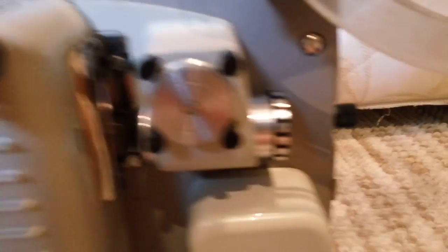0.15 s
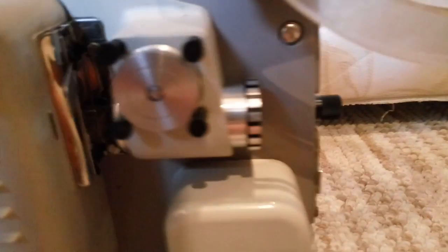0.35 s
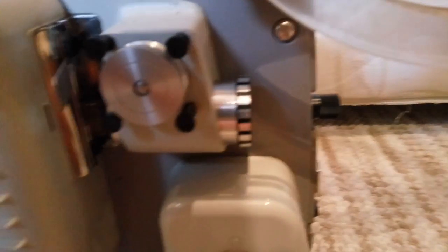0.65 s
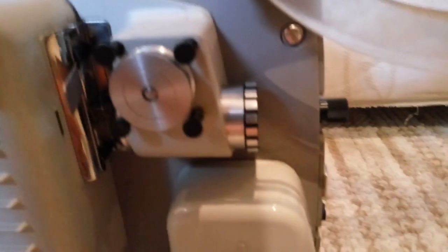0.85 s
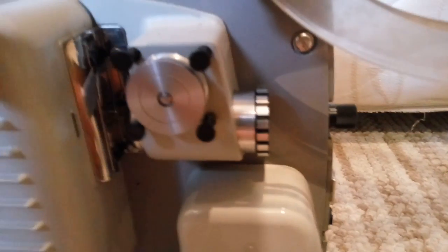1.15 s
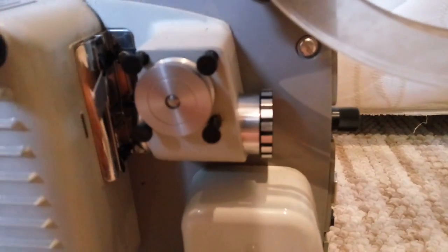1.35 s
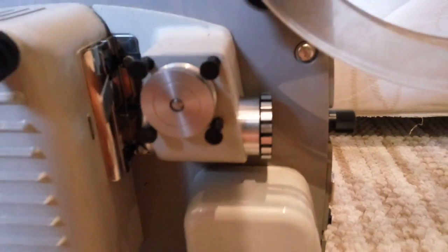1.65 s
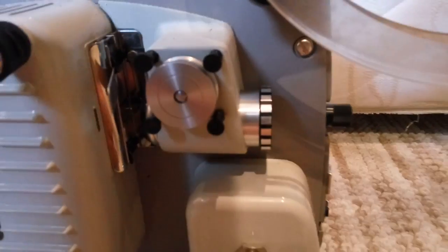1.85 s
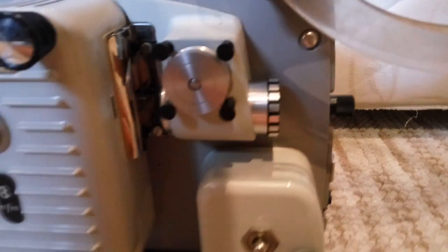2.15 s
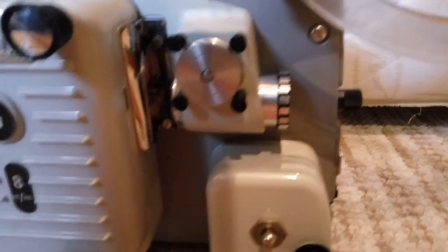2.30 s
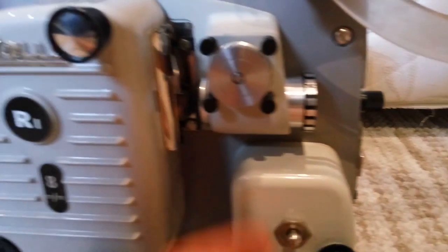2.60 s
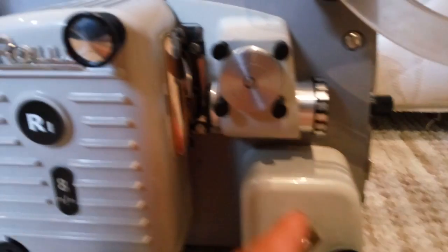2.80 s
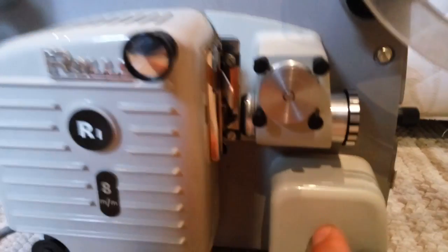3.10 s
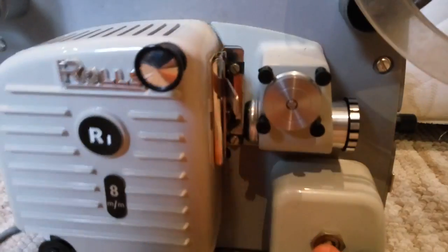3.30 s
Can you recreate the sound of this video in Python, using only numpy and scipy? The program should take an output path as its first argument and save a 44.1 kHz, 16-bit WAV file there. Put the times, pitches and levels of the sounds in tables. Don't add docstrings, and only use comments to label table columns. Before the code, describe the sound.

A small film projector whirrs and chatters rapidly, then a toggle switch snaps loudly near the end

```python
import sys
import numpy as np
from scipy import signal
from scipy.fft import rfft, irfft
from scipy.io import wavfile
from scipy.ndimage import uniform_filter1d

SR = 44100
rng = np.random.default_rng(int(sys.argv[2]) if len(sys.argv) > 2 else 0)


def volts_from_db(level):
    exponent = np.asarray(level, float) / 20
    return 10 ** exponent


def digitize_waveform(pressure):
    field = np.atleast_2d(pressure).T
    bounded = np.clip(field, -1, 1)
    quanta = np.round(bounded * 32767).astype(np.int16)
    wavfile.write(sys.argv[1], SR, quanta)


N = 152586
T = np.arange(N) / SR


def at_level(x, db):
    return x * volts_from_db(db) / np.sqrt(np.mean(x ** 2))


def band(x, lo_hz, hi_hz, order=2):
    return signal.sosfilt(signal.butter(order, [lo_hz, hi_hz], "bandpass", fs=SR, output="sos"), x)


def walk(rate_hz):
    hold = int(SR / rate_hz)
    steps = np.repeat(rng.standard_normal(N // hold + 1), hold)
    return 0.68 * uniform_filter1d(uniform_filter1d(steps, hold), hold)[:N]


def swell(hz):
    # middle in seconds, length in seconds, resonance in Hz, swell in dB.
    swells = [(0.29, 0.33, 332, 4.5), (1.45, 0.45, 332, 4.5), (2.654, 0.29, 332, 8), (0.28, 0.25, 915, 2.5),
              (1.1, 0.23, 915, 5), (.17, 0.36, 1178, 7.5), (1.8, .12, 1178, 12), (2.62, 0.82, 1178, 8.5),
              (0.16, 0.075, 1362, 8.5), (.46, 0.041, 1362, 5.5), (0.903, 0.086, 1362, 8),
              (1.35, 0.43, 1362, 6), (2.4, 0.079, 1362, 4), (2.89, 0.23, 1362, 4.5), (1.1, 0.41, 2565, 8),
              (1.23, 0.18, 2565, 7), (1.53, .15, 2565, 0), (1.8, 1, 2565, 6.5), (0.65, 0.2, 3320, 6.5),
              (0.92, 0.27, 3320, 10), (1.276, 0.091, 3320, 9.5), (1.64, 0.28, 3320, 4),
              (0.49, 0.48, 3830, 5), (0.85, .1, 3830, 11.5), (1.63, 0.66, 3830, 4), (2.38, 0.18, 3830, 5.5),
              (2.66, 0.16, 3830, 6), (3.7, 0.11, 3830, 10.5), (3.18, .25, 3830, 4)]
    near = [row for row in swells if abs(np.log(hz / row[2])) < 1 / 30]
    return sum(db * np.exp(-(2 * (T - middle) / length) ** 2) for middle, length, _, db in near)


def ring(push, modes, patchy_db=0., rate_hz=10.0):
    out = np.zeros((2, N))
    for hz, left_db, right_db, t60 in modes:
        pole = np.exp(2j * np.pi * hz / SR - np.log(1000) / (t60 * SR))
        uneven_push = push * volts_from_db(patchy_db * walk(rate_hz) + swell(hz))
        tone = signal.lfilter([1], [1, -pole], uneven_push) / np.sqrt(t60)
        turn = np.exp(-1j * np.pi * min((hz / 2200) ** 2, 1) * rng.uniform(0.48, 2.39))
        out += [volts_from_db(left_db) * tone.imag, volts_from_db(right_db) * (tone * turn).imag]
    return out


def colour(x, spectrum):
    points = np.array(spectrum)
    octave = np.log2(np.maximum(np.fft.rfftfreq(N, 1 / SR), 10))
    point_octave = np.log2(points[:, 0])
    fall_db_per_octave, air_db = -51, -37.5
    db = np.interp(octave, point_octave, points[:, 1])
    db = db + fall_db_per_octave * np.maximum(octave - point_octave[-1], 0)
    return irfft(rfft(x) * np.hypot(volts_from_db(db), volts_from_db(air_db)), N)


def control(column):
    # time in seconds, lateness of the strikes in ms, cam thump level in dB,
    # chatter level in dB, left port brightness in dB.
    run = [(0, 0.96, 6, -5, 4.5), (.25, 0.78, 2.5, 0, 2), (.45, 0.53, 7.5, -2, 4), (.8, 0.23, 2, -4, 4),
           (1.2, 0.069, 3.5, -3, 2.5), (1.55, 0.075, 5, -0.5, -1), (1.9, 0.065, 2, -3, -1),
           (2.3, 0.11, 4, -2, -3), (2.7, 0.33, 3, 0, -4.5), (3.0, 0.35, 4, -1, -4),
           (3.46, 0.65, 3, -2, -6.5)]
    return np.interp(T, np.array(run)[:, 0], np.array(run)[:, column])


def strikes(places, scatter_db, jitter_s, hard=()):
    frame_hz = 19.45
    blows = np.zeros(N)
    frames = np.arange(-1, int(N / SR * frame_hz) + 1)
    for place, db in places:
        time_chance, force_chance = rng.standard_normal((2, len(frames)))
        t = (frames + place) / frame_hz
        t = t + np.interp(t, T, control(1)) / 1000 + jitter_s * time_chance
        extra_db = sum(up * (abs(t - s) < 1 / 160) for s, up in hard)
        force_db = db + scatter_db * force_chance + extra_db
        ok = (t >= 0) & (t < (N - 1) / SR)
        blows[(t[ok] * SR).astype(int)] += volts_from_db(force_db[ok])
    return blows


def contact(blows, length_s, rough):
    scrape = signal.fftconvolve(blows, np.hanning(int(length_s * SR) + 3))[:N]
    return (1 - rough) * 3 * blows + rough * scrape * rng.standard_normal(N)


def hum():
    # pitch in Hz, rms level in dB.
    hum_tones = [(99.9, -58), (199.8, -67.5)]
    return sum(volts_from_db(db + .45 * walk(6.7)) * np.sqrt(2) * np.sin(2 * np.pi * hz * T) for hz, db in hum_tones)


def gear_whirr():
    # pitch in Hz, left level in dB, right level in dB, time to fade by 60 dB in seconds.
    gear_modes = [(1100, -8, -6, .04), (1178, -5, -3, .06), (1362, -6, 3, .09), (1550, -14, -7, .06),
                  (1735, -9, -4, .04), (2570, -18, -2, .06), (3320, -20, 2, .055), (3820, -14, -4, .05)]
    gears = ring(rng.standard_normal(N), gear_modes, 0.3, 4.6)
    return at_level(band(gears, 800., 4400.0), -44)


def fan_whistle():
    # pitch in Hz, left level in dB, right level in dB, time to fade by 60 dB in seconds.
    fan_modes = [(9300, -4, -5, 0.0046), (10900, -3, -4, 0.0028)]
    fan = np.zeros((2, N))
    for mode in fan_modes:
        fan += band(ring(rng.standard_normal(N), [mode], 2, 7.3), mode[0] - 500, mode[0] + 500)
    return at_level(fan, -79)


def motor_rush(claw):
    # frequency in Hz, strength in dB.
    rush_left = [(30, -16), (130, -7.5), (260, 11.5), (620, -1), (1100, 13.5), (2300, 0), (3200, -2),
                 (7200, -8)]
    rush_right = [(30, -1), (130, 2), (260, 9.5), (620, 3), (1300, 0.5), (3300, 12.5), (4300, -1.5),
                  (7200, -18.5)]
    tick_db, tick_s = 12.5, .005
    tick = volts_from_db(tick_db) * signal.fftconvolve(claw, np.hanning(int(tick_s * SR)))[:N]
    low = signal.butter(2, 600., "low", fs=SR, output="sos")
    high = signal.butter(2, 3800., "high", fs=SR, output="sos")
    shared, rush = rng.standard_normal(N), []
    for spectrum in (rush_left, rush_right):
        own = rng.standard_normal(N) * volts_from_db(2.7 * walk(29.88))
        shared_low = signal.sosfilt(low, shared - 0.86 * own)
        treble_tick = signal.sosfilt(high, tick * rng.standard_normal(N))
        rush.append(colour(own + shared_low + treble_tick, spectrum))
    return at_level(np.array(rush), -44)


def rumble():
    deep = signal.sosfilt(signal.butter(2, 45., fs=SR, output="sos"), rng.standard_normal(N))
    return at_level(deep * volts_from_db(5 * walk(5.5)), -67.5) * np.array([[.8], [1.2]])


def motor(claw):
    return hum() + fan_whistle() + gear_whirr() + motor_rush(claw) + rumble()


def claw_strikes():
    # place in the frame from 0 to 1, strength in dB.
    claw_places = [(.515, -1), (.665, 0), (.105, -11), (.94, -12)]
    # time in seconds, extra strength in dB.
    hard_strikes = [
        (.545, 5),
        (.699, 3),
        (.802, 3),
        (.9, 2),
        (1.37, 2),
        (1.676, 4),
        (1.985, 8),
        (3.27, 5),
    ]
    return strikes(claw_places, 1.2, .0003, hard_strikes)


def lever():
    # place in the frame from 0 to 1, strength in dB.
    lever_places = [(.125, -2), (.435, 0), (.565, -3), (.76, -7), (.28, -8), (.9, -9)]
    # pitch in Hz, left level in dB, right level in dB, time to fade by 60 dB in seconds.
    plate = [(828, -11.5, -1, 0.032), (909, 2, -3.5, 0.057), (926, -12.5, -6.5, 0.072)]
    push = contact(strikes(lever_places, 0.56, 0.00041), 0.0047, 0.52)
    return at_level(band(ring(push, plate, 1.), 690.0, 1016.0), -47)


def pawl():
    # place in the frame from 0 to 1, strength in dB.
    pawl_places = [(.93, 0), (.18, 0), (.06, -2), (.28, -2), (.51, -1.5), (.63, -3)]
    # pitch in Hz, left level in dB, right level in dB, time to fade by 60 dB in seconds.
    bracket = [(1128, -18, -9, 0.0083), (1178, -6, 3, 0.066), (1383, -17, -5, 0.027),
               (1510, -15, 3.5, 0.037), (1790, -9, 8, 0.023), (1885, -13.5, -3, 0.022)]
    push = contact(strikes(pawl_places, 1.3, 0.00045), 0.0038, 0.68)
    return at_level(band(ring(push, bracket, 1.2, 8.6), 880.0, 2300.0), -51)


def cam():
    # place in the frame from 0 to 1, strength in dB.
    cam_places = [(.195, -2.5), (.78, -4), (.98, -13.5), (.44, -14)]
    # pitch in Hz, left level in dB, right level in dB, time to fade by 60 dB in seconds.
    casing = [(332.9, -1, -2.2, 0.073), (379.2, -4, 0.97, 0.039), (406.5, 0.9, -0.53, 0.061)]
    teeth_hz, teeth_s = 374, 0.0045
    t = T[:int(teeth_s * SR)]
    teeth = np.hanning(len(t)) * np.sin(2 * np.pi * teeth_hz * t)
    push = contact(strikes(cam_places, 0.85, 0.0004), 0.0076, 0.13)
    push = signal.fftconvolve(push, teeth)[:N]
    thumps = band(ring(push, casing, 0.68, 5.), 317.7, 454.0)
    return at_level(thumps, -41.5) * volts_from_db(control(2))


def gate(claw):
    # pitch in Hz, left level in dB, right level in dB, time to fade by 60 dB in seconds.
    gate_modes = [(2270, -12, -8, .018), (2560, -21, -6, .03), (2800, -22, -8, .015),
                  (4580, -13, -15, .016), (5400, -20, -19, .007), (6990, -17, -30, .010),
                  (7500, -22, -33, .007)]
    return at_level(ring(contact(claw, 0.0035, 0.57), gate_modes, 1.0, 4.66), -48)


def shutter():
    # place in the frame from 0 to 1, strength in dB.
    shutter_places = [(.52, 0), (.935, -1), (.11, -4), (.69, -6)]
    # time in seconds, extra strength in dB.
    slams = [
        (1.282, 7),
        (.545, 2),
        (1.982, 3),
    ]
    # pitch in Hz, left level in dB, right level in dB, time to fade by 60 dB in seconds.
    aperture = [(2560, -21, -6, .035), (2960, -24, -9, .02), (3320, -18, 2, .045), (4600, -19, -21, .016)]
    push = contact(strikes(shutter_places, 1.5, .0004, slams), .006, .9)
    return at_level(band(ring(push, aperture, .8, 5.), 2300., 4900., order=3), -42.5)


def spring():
    # place in the frame from 0 to 1, strength in dB.
    spring_places = [(.175, 0), (.95, -3.5), (.40, -9), (.55, -9), (.68, -10)]
    # pitch in Hz, left level in dB, right level in dB, time to fade by 60 dB in seconds.
    guide = [(3800, -13, 0, .04), (3880, -9, -3, .035), (3320, -28, -8, .045)]
    push = contact(strikes(spring_places, 1.5, .0004), .006, .95)
    return at_level(band(ring(push, guide, .8, 5.), 3450., 4050.), -44.5)


def chatter(claw):
    left, right = band(gate(claw) + shutter() + spring(), 1500., 7600., order=3)
    ports = np.array([left * volts_from_db(control(4)), band(right, 1000., 5200., order=1)])
    return ports * volts_from_db(control(3))


def fading_noise(blows, t60_s):
    fade = volts_from_db(-60 * T[:SR // 2] / t60_s)
    return signal.fftconvolve(blows, fade)[:N] * rng.standard_normal(N)


def switch():
    # time in seconds, strength in dB.
    snap = [
        (3.3688, -44),
        (3.3871, 0),
        (3.3881, -1),
        (3.3892, -6),
        (3.3935, -17),
        (3.396, -17),
        (3.403, -27),
        (3.422, -31),
        (3.454, -40),
    ]
    # pitch in Hz, left level in dB, right level in dB, time to fade by 60 dB in seconds.
    toggle = [(530, -27, -22, .09), (720, -25, -18, .07), (1080, -27, -21, .06), (1986, -11, -9, .012),
              (2300, -5, 0, .01), (2650, -9, -1, .01), (2955, -19, 2, .026), (3395, -24, -1, .026),
              (3805, -24, -8, .015), (5087, -11, -11, .012), (5880, 2, -11, .011), (6600, -6, -20, .009),
              (7440, -12, -13, .007), (10600, -18, -13, .004)]
    # frequency in Hz, strength in dB.
    crack_left = [(150, -17.5), (1000, -4), (2300, -1.5), (3500, -15.5), (6000, 1.5), (8000, -2),
                  (10000, -15.5), (14000, -30)]
    crack_right = [(150, -5), (1000, -16), (2300, -2.5), (3300, 9), (5500, -6.5), (7000, -14), (10000, -17),
                   (14000, -26)]
    snap_db, crack_db, rattle_db = 7.5, -5, -27
    blows = np.zeros(N)
    for s, db in snap:
        blows[int(s * SR)] += volts_from_db(db)
    body = ring(contact(blows, 0.0014, 0.28), toggle)
    crack = []
    for spectrum in (crack_left, crack_right):
        burst = fading_noise(blows, 0.0075)
        rattle = fading_noise(blows, 0.3) * volts_from_db(4.2 * walk(150))
        rattle = band(rattle, 200., 5500.0, order=4)
        crack.append(colour(burst + volts_from_db(rattle_db) * rattle, spectrum))
    crack = band(np.array(crack), 120., 14000., order=1)
    return volts_from_db(snap_db) * (body / np.abs(body).max() + volts_from_db(crack_db) * crack / np.abs(crack).max())


def room(x):
    t60_s, build_up_s, room_db = 0.15, .005, -29
    t = T[:SR // 2]
    tail = rng.standard_normal((2, len(t))) * volts_from_db(-60 * t / t60_s) * (1 - np.exp(-t / build_up_s))
    tail = band(tail, 700., 4500.0, order=1)
    tail = tail / np.sqrt((tail ** 2).sum(1, keepdims=True))
    return volts_from_db(room_db) * signal.fftconvolve(x, tail, axes=1)[:, :N]


def scene():
    claw = claw_strikes()
    near = cam() + lever() + pawl() + chatter(claw) + switch()
    return near + room(near) + motor(claw)


def roll_off(x):
    return signal.sosfilt(signal.butter(12, 15740, fs=SR, output="sos"), x)


def record(dry):
    top = signal.butter(10, 15400, fs=SR, output="sos")
    mix = np.clip(signal.sosfilt(top, dry), -1, 1)
    return roll_off(mix)


dry = scene()
out = record(dry)
digitize_waveform(out)
```